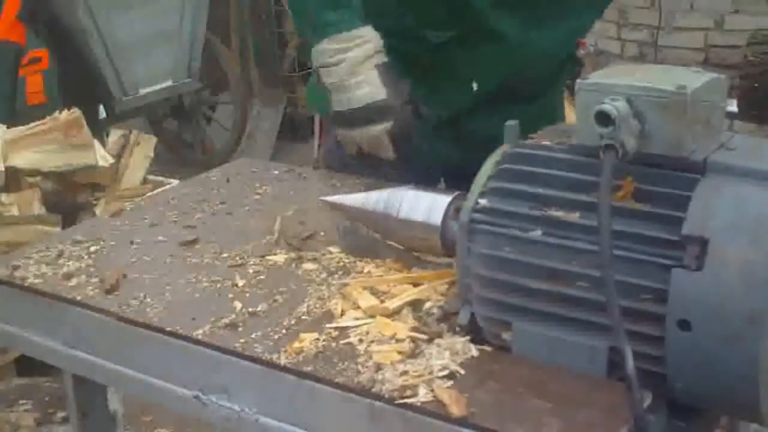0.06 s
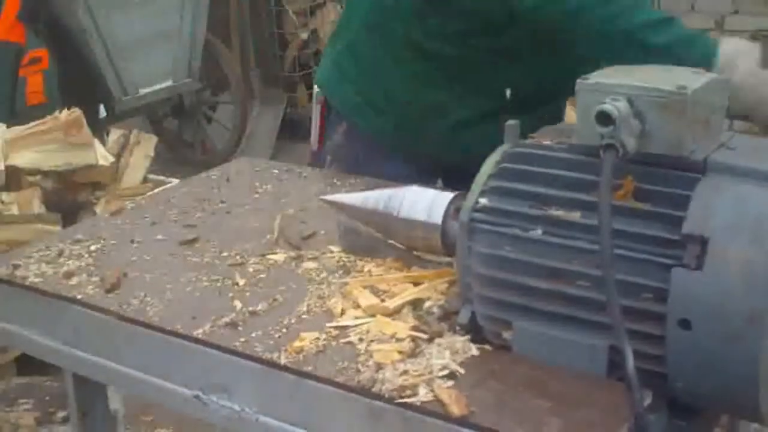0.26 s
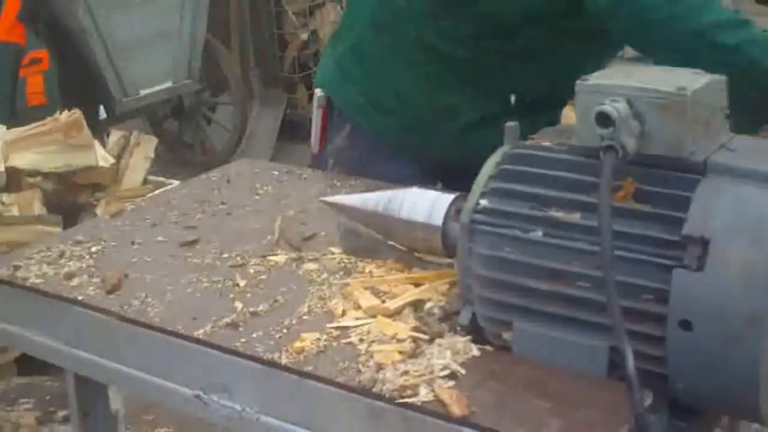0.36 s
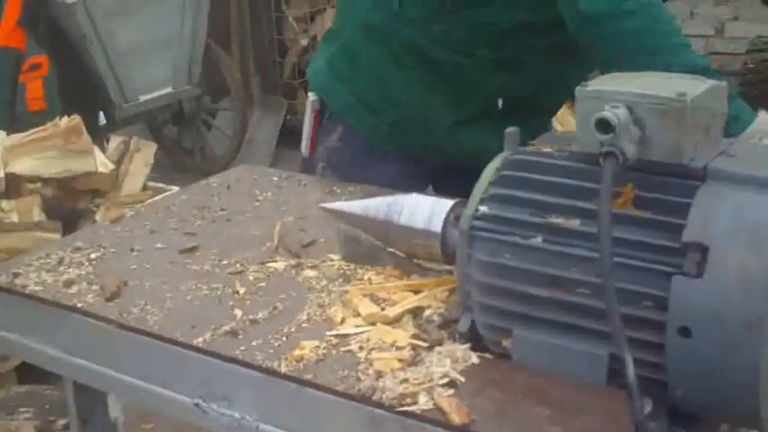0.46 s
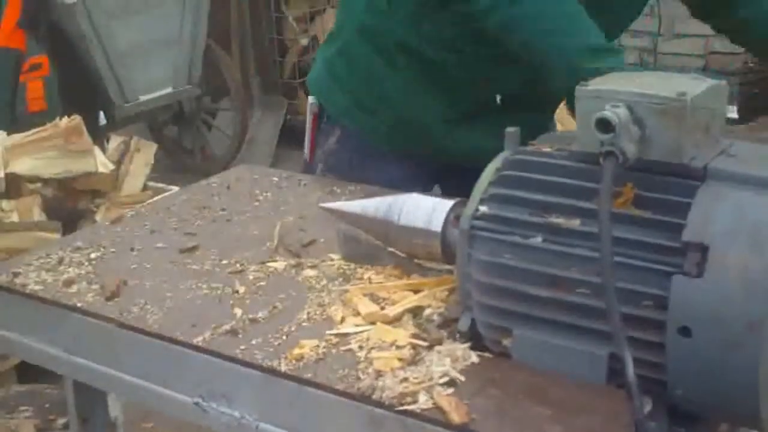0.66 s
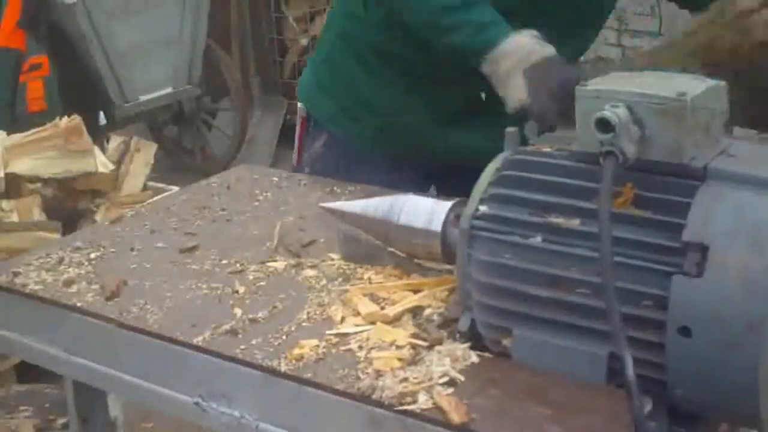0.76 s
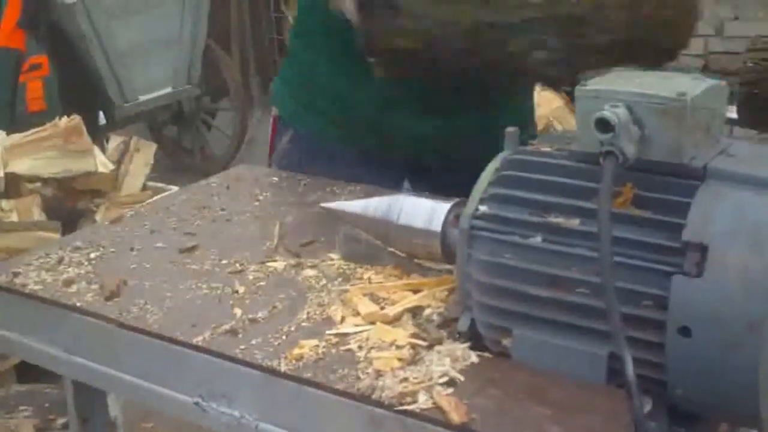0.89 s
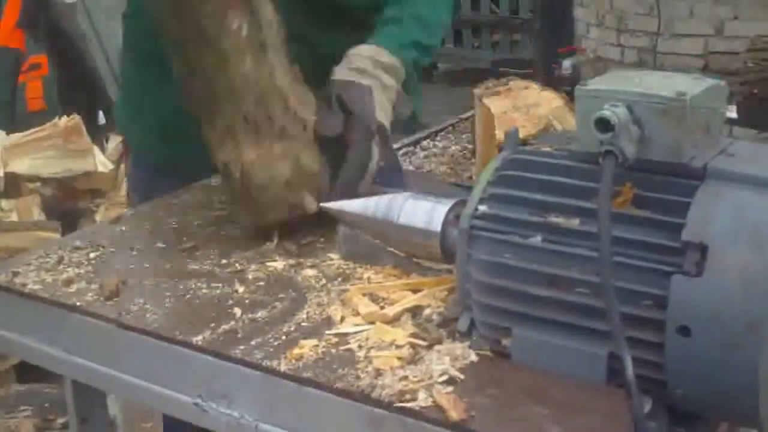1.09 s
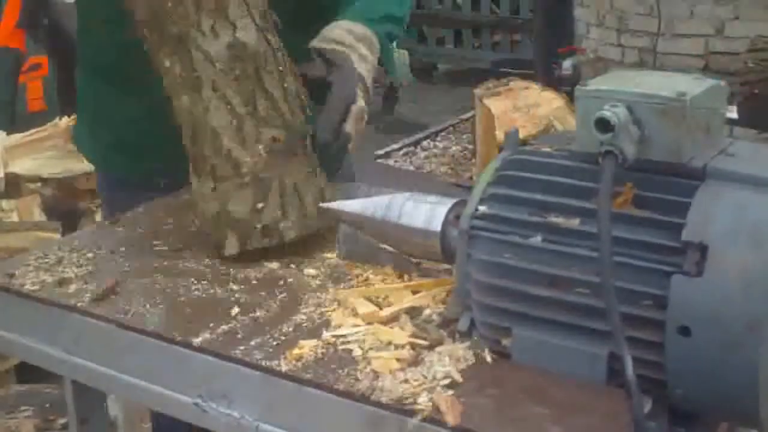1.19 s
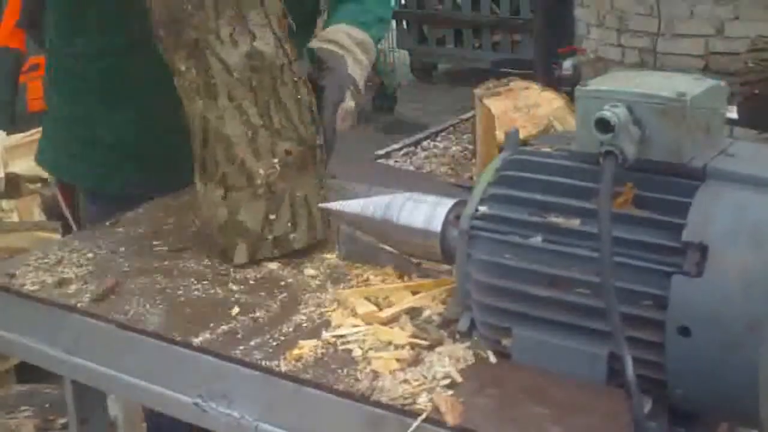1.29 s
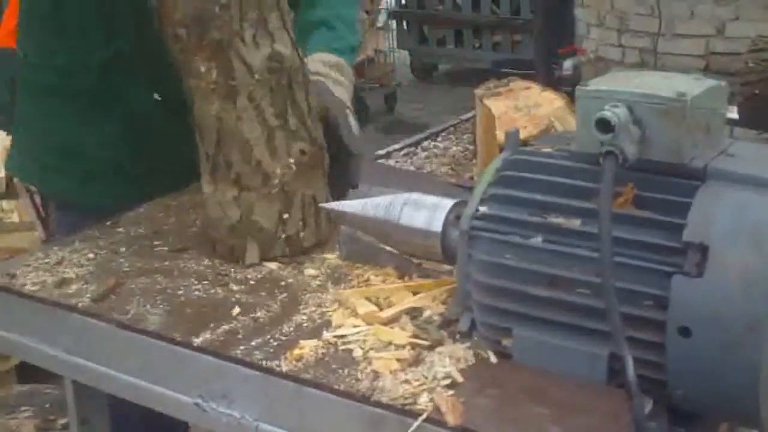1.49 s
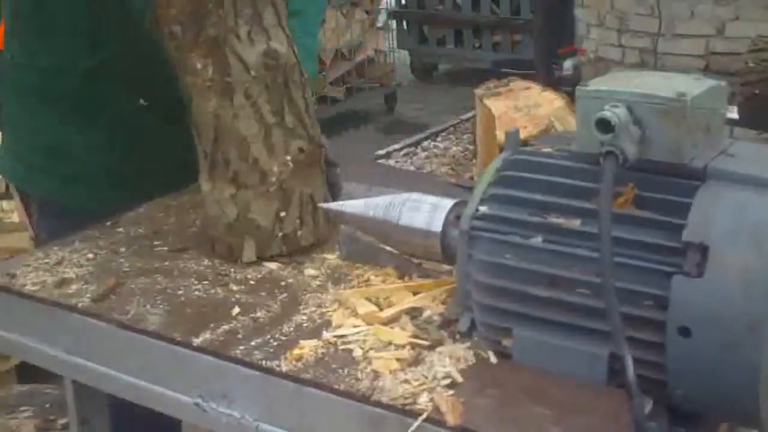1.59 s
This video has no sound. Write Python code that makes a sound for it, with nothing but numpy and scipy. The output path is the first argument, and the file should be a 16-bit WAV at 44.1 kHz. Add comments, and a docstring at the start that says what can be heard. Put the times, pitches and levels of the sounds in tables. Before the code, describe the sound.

A log splitter's electric motor whirs and whines close by in a yard. Wood thuds and clatters as a log is pulled from a pile, bark crackling, then it lands hard on a steel bench, briefly ducking the motor.

```python
"""Log splitter at idle

The electric motor of a screw log splitter whines in harmonics of its shaft rate over the rush of its fan.
A log is pulled from the pile, knocking against others and shedding bark, then slammed on the steel bench.
Each impact excites damped modes and a dense ring, echoed faintly by the yard walls.
After each heavy knock the motor's sound sinks and creeps back."""
import sys
import numpy as np
from scipy import signal
from scipy.fft import rfft, irfft, next_fast_len
from scipy.io import wavfile

SR = 44100
rng = np.random.default_rng(int(sys.argv[2]) if len(sys.argv) > 2 else 0)


def digitize_waveform(pressure):
    """Quantize a signal to 16-bit integers and store it at the path in sys.argv[1].

    Rows of a 2-D input are taken as channels; values are limited to [-1, 1].
    """
    field = np.atleast_2d(pressure).T
    bounded = np.clip(field, -1, 1)
    quanta = np.round(bounded * 32767).astype(np.int16)
    wavfile.write(sys.argv[1], SR, quanta)


N = 72765
T = np.arange(N) / SR

# Levels in the tables are relative; those of noise spectra are densities.
# shaft harmonics: f/Hz, level/dB
HARMONICS = [(400, -45), (800, -53), (1000, -48), (1200, -46), (1400, -38), (1600, -36), (1800, -41.5),
             (2400, -47), (2600, -44.5), (2800, -47.5), (3000, -51), (4400, -50), (4600, -47.5),
             (5400, -61), (6000, -55), (7000, -40.5)]
# swell of the strongest harmonic: t/s, level/dB
WHINE_SWELL = [(0, 0.5), (.25, 2), (.38, -4), (.58, 4.5), (.8, 3), (1.0, 5), (1.24, 2), (1.5, -26),
               (1.59, 9), (1.65, -0.5)]
# spectrum of the fan's rush: f/Hz, level/dB
FAN_SPECTRUM = [(40, -39), (80, -35), (130, -20), (200, -17), (290, -18), (500, -17), (750, -15),
                (1050, -9.5), (1600, -10), (2200, -9), (3000, -15.5), (4000, -17), (5600, -22), (8500, -24),
                (15500, -26.5)]
# peaks and notches of the fan cowl: f/Hz, width/Hz, lift/dB
COWL_RESONANCES = [(200, 24, 9), (403, 17, 12), (1008, 99, -6), (2490, 440, -4), (4260, 73, -7),
                   (7000, 65, 10.5), (11340, 370, 5)]
# dips in the motor's level: t/s, depth/dB, fall time/s
MOTOR_DIPS = [(0.512, 11, 0.052), (1.1, 3.5, 0.09), (1.26, 25.5, 0.046)]

# impacts: t/s, level/dB, low edge/Hz, contact brightness/Hz, factor on T60
BENCH_SLAMS = [(1.2597, -5, 166, 11900, 0.46), (1.3022, -23, 220, 2500, 0.98)]  # the log lands and rocks once
PILE_THUDS = [(.105, -33, 119, 900, 0.53), (.2752, -15.5, 221, 760, 0.78), (.282, -23, 200, 1330, 1.26),
              (.363, -25.5, 200, 1100, 1.43), (.401, -31, 200, 600, 0.45), (.415, -24.5, 200, 820, 0.68),
              (.57, -28, 70, 130, 3.3)]  # dull blows within the pile
LOG_KNOCKS = [(.5072, -20, 127, 1200, 0.8), (.5108, -10.5, 136, 1770, 0.5), (.5195, -17.5, 333, 2220, 0.78),
              (.546, -32, 170, 1440, 1.6), (1.0895, -10, 202, 445, 0.27), (1.0962, -19.5, 293, 1510, 0.61),
              (1.1162, -11.5, 1170, 5000, 0.31)]  # log against log
LOG_DROPS = [(.6312, -16, 121, 1900, 0.83)]  # a small log falls back
# modes of the struck bodies: f/Hz, level/dB, T60/s
BENCH_MODES = [(169, -27.5, 0.24), (242, -3, 0.072), (297, -3.5, 0.085), (357.5, -19, 0.25),
               (581, -8.5, 0.056), (690, -6, 0.067), (776, -17.5, 0.048), (1040, -12, 0.077),
               (1510, -31, .07), (2100, 2, 0.022), (2574, -31, .06), (3640, -39, 0.053), (4140, -16, 0.16)]  # log and bench together
PILE_MODES = [(186, -26, 0.14), (333.4, -1.5, 0.27), (396, -3.5, 0.064), (445, -5, 0.088), (640, -4, 0.085),
              (1060, -10.5, 0.16)]
LOG_MODES = [(172, -21, 0.28), (206.3, -16, 0.6), (271, -39, .08), (387, -2.5, 0.12), (469.6, -11, 0.3),
             (654, -9, 0.12), (820, 1.5, 0.033), (975, 7.5, 0.058), (1260, 7.5, 0.042), (1516, -0.5, 0.09),
             (1767, -2, 0.087), (1956, -8.5, 0.12), (2607, 4, 0.042), (3400, -14, 0.05)]
DROP_MODES = [(212, -17, 0.17), (252, -19.5, 0.19), (775, -7, 0.065), (950, 0.5, 0.047),
              (1146, -0.5, 0.041), (1406, -2.5, .04), (1480, 1, 0.033), (1560, -4, 0.033)]  # the small log, with the boom of the pile
# dense ring of bench and wood: f/Hz, level/dB, T60/s
BENCH_RING = [(40, -15, .1), (110, -19, 0.074), (250, 0, 0.066), (900, 0, 0.11), (2000, -8, 0.14),
              (4200, -8, 0.17), (8000, -10.5, 0.056), (15000, -25, 0.15)]
WOOD_RING = [(40, -13, .1), (99, -33, .15), (200, 7.5, 0.17), (600, 3.5, 0.25), (1200, 11, 0.079),
             (2500, 0.5, 0.074), (5000, 2, 0.096), (14800, -52, .04)]
# spectrum of the landing's crack: f/Hz, level/dB
CRACK_SPECTRUM = [(40, -38), (110, -43), (250, 5), (430, -0.5), (680, 7), (1500, -0.5), (4000, -2.5),
                  (6500, -4), (10000, -16), (15000, -7)]
# rumble of shifting logs: t/s, level/dB
RUMBLE_ENVELOPE = [(0, -53), (.25, -43.5), (.62, -40), (.75, -68)]
# rasps of loose splinters: t/s, level/dB, f/Hz, T60/s
SPLINTER_RASPS = [(0.288, -31, 4420, 0.12), (.362, -36, 5030, .04), (.549, -26.5, 3400, 0.052)]

# crunches of bark: t/s, level/dB, rise time/s, T60/s, low edge/Hz
BARK_CRUNCHES = [(.036, -63, .002, 0.041, 5000), (0.104, -31, .004, 0.13, 495),
                 (.258, -17, 0.0012, 0.016, 5900), (0.359, -24.5, .002, 0.15, 1500),
                 (.396, -34, .002, 0.046, 5000), (0.417, -27, 0.0012, 0.022, 2000),
                 (0.508, -19, 0.0032, 0.055, 600), (0.524, -27, .001, 0.013, 1000),
                 (0.6287, -19, 0.0019, 0.021, 4400), (1.0876, -19, .002, 0.016, 1000),
                 (1.115, -17.5, 0.0014, 0.03, 800), (1.239, -23, 0.0069, 0.16, 3000),
                 (1.3004, -33, 0.00074, 0.023, 1500), (1.3345, -42, .0005, 0.0091, 5000)]
# spectrum of bark fractures: f/Hz, level/dB
BARK_SPECTRUM = [(300, -41), (1500, -18), (3500, -2), (5500, -6.5), (9000, -7), (15000, -8.5)]
# modes of a snapping splinter: f/Hz, level/dB, T60/s
SNAP_MODES = [(5760, 1.5, 0.0021), (8100, -2, 0.002), (10900, -1.5, 0.001), (14800, -10, 0.0028)]

# spectrum of the wall echo: f/Hz, level/dB
ECHO_SPECTRUM = [(40, -19), (120, 6), (230, 2), (550, -2), (1000, -2.5), (2500, -3.5), (6000, -9.5),
                 (15000, -25)]
# spectrum of the yard's background and the pile's rumble: f/Hz, level/dB
LOW_SPECTRUM = [(25, -31), (60, -27), (110, -4.5), (165, -4.5), (240, -11.5), (500, -11), (1500, -4),
                (8000, -30)]


def motor():
    """Periodic rotation gives shaft harmonics and modulates the fan's noise at the blade-passing rate."""
    shaft_hz, blades, whine_order = 49.99, 4, 32
    angle = 2 * np.pi * shaft_hz * np.cumsum(1 + 0.0002 * drift(5.8)) / SR
    rush = coloured(rng.standard_normal(N), FAN_SPECTRUM, COWL_RESONANCES)
    out = from_db(-30.5) * rush * (1 + 0.072 * np.sin(blades * angle))
    for hz, db in HARMONICS:
        order = round(hz / shaft_hz)
        swell_db = np.interp(T, *np.transpose(WHINE_SWELL)) if order == whine_order else 0
        waver_db = 1.5 * drift(3.3)
        amplitude = np.sqrt(2) * from_db(db + 0.5 + swell_db + waver_db)
        out += amplitude * np.sin(order * angle + 2 * np.pi * rng.random())
    # the level climbs steadily and sinks at the heavy knocks
    start_db, climb_db_per_s = -7, 19.5
    dip_db = sum(depth * np.clip((T - s) / fall, 0, 1) for s, depth, fall in MOTOR_DIPS)
    return out * from_db(start_db + climb_db_per_s * T - dip_db)


def bench():
    """Impact on steel: a broadband crack, duller for a softer contact, as log and bench vibrate freely."""
    noise = coloured(rng.standard_normal(N), CRACK_SPECTRUM)
    out = impacts(BENCH_SLAMS, BENCH_MODES, BENCH_RING, ring_db=-0.5)
    for s, db, _, bright_hz, _ in BENCH_SLAMS:
        envelope = place(from_db(db + 4) * decay(T, t60=0.031), s)
        out += cut(noise * envelope, bright_hz, "low")
    return out


def woodpile():
    """Collisions excite the damped modes of the logs over the low rumble of their shifting."""
    envelope = from_db(np.interp(T, *np.transpose(RUMBLE_ENVELOPE)))
    rumble = envelope * coloured(rng.standard_normal(N), LOW_SPECTRUM)
    thuds = impacts(PILE_THUDS, PILE_MODES, WOOD_RING, ring_db=1.5)
    knocks = impacts(LOG_KNOCKS, LOG_MODES, WOOD_RING, ring_db=3.5)
    drops = impacts(LOG_DROPS, DROP_MODES, WOOD_RING, ring_db=-8.5)
    return rumble + thuds + knocks + drops


def bark():
    """Brittle fracture: bursts of tiny random impulses merge into crunches."""
    fractures_per_s = 15000
    sizes = from_db(np.minimum(rng.exponential(1, N), 4)) * rng.choice([-1, 1], N)
    grains = coloured(sizes * (rng.random(N) < fractures_per_s / SR), BARK_SPECTRUM)
    out = np.zeros(N)
    for s, db, rise, t60, low_hz in BARK_CRUNCHES:
        envelope = np.minimum(T / rise, 1) * decay(np.maximum(T - rise, 0), t60)
        out += cut(grains * place(from_db(db) * envelope, s), low_hz, "high")
    return out


def splinters():
    """One splinter snaps into heavily damped vibration; loose ones rasp as narrow-band noise."""
    snap = cut(free_vibration(SNAP_MODES, T[:SR // 20]), 3500, "high")
    out = place(from_db(0.5) * snap, s=0.6281)
    bandwidth_hz = 800
    for s, db, hz, t60 in SPLINTER_RASPS:
        roughness = cut(rng.standard_normal(N), bandwidth_hz / 2, "low")
        rasp = unit_rms(roughness * np.sin(2 * np.pi * hz * T))
        out += place(from_db(db) * rasp * decay(T, t60), s)
    return out


def yard(sound):
    """Reverberation: wall reflections add a faint, dull tail, heard over a low ambient noise."""
    tail = place(coloured(rng.standard_normal(N), ECHO_SPECTRUM) * decay(T, t60=0.25), s=0.012)
    echo = signal.fftconvolve(sound, tail / np.sqrt(np.sum(tail ** 2)))[:N]
    background = coloured(rng.standard_normal(N), LOW_SPECTRUM)
    return from_db(-21.5) * echo + from_db(-51) * background


def impacts(blows, modes, ring, ring_db):
    """Impulse response: a body's main modes and dense ring; the contact sets bandwidth and damping."""
    t, out = T[:SR // 2], np.zeros(N)
    ages = t / np.array(blows)[:, 4:]  # one time axis per blow, scaled for its damping
    for (s, db, low_hz, bright_hz, stretch), tail in zip(blows, dense_ring(ring, ages)):
        tone = free_vibration([(hz, level, t60 * stretch) for hz, level, t60 in modes], t)
        body = cut(tone + from_db(ring_db) * tail, low_hz, "high")
        out += place(from_db(db) * cut(body, bright_hz, "low"), s)
    return out


def free_vibration(modes, t):
    """Modal superposition: damped sinusoids of alternating polarity."""
    return sum((-1) ** k * from_db(db) * decay(t, t60) * np.sin(2 * np.pi * hz * t)
               for k, (hz, db, t60) in enumerate(modes))


def dense_ring(ring, ages):
    """Modal overlap: crowded modes act as bands of noise, each decaying at its own rate."""
    edges = np.geomspace(30, 17000, 15)
    white = rng.standard_normal((len(ages), 2, ages.shape[1]))
    out = 0
    for k, (low, high) in enumerate(zip(edges, edges[1:])):
        hz = np.sqrt(low * high)
        bandpass = signal.butter(2, [low, high], "band", fs=SR, output="sos")
        # adjacent bands use independent noise; reversal moves the filter's build-up off the attack
        band = signal.sosfilt(bandpass, white[:, k % 2])[:, ::-1]
        out += band * from_db(at_hz(ring, hz)) * decay(ages, t60=at_hz(ring, hz, column=2))
    gains = from_db(at_hz(ring, np.linspace(1, SR / 2, SR // 10)))
    return out / np.sqrt(np.mean(gains ** 2))


def coloured(x, spectrum, peaks=()):
    """Linear filtering by a spectrum with Lorentzian peaks and notches, scaled to unit rms."""
    size = next_fast_len(N)
    hz = np.arange(size // 2 + 1) * SR / size
    peaks_db = sum(lift / (1 + (2 * (hz - f) / width) ** 2) for f, width, lift in peaks)
    gain = from_db(at_hz(spectrum, hz) + peaks_db)
    return unit_rms(irfft(rfft(x, size) * gain, size)[:N])


def drift(hz):
    """Low-passed noise: a slow random wander of unit rms."""
    hop, settling = 40, 2000
    pole = np.exp(-2 * np.pi * hz * hop / SR)
    white = rng.standard_normal(N // hop + settling + 2)
    slow = signal.lfilter([1], [1, -2 * pole, pole * pole], white)[settling:]
    return np.interp(np.arange(N) / hop, np.arange(len(slow)), unit_rms(slow))


def cut(x, hz, kind):
    """Second-order high- or low-pass filter."""
    return signal.sosfilt(signal.butter(2, hz, kind, fs=SR, output="sos"), x + 1e-18)


def at_hz(table, hz, column=1):
    """Interpolation of a spectrum on a logarithmic frequency axis."""
    table = np.array(table)
    return np.interp(np.log(hz + 1e-9), np.log(table[:, 0]), table[:, column])


def decay(t, t60):
    """Exponential decay, 60 dB in t60 seconds."""
    return from_db(-60 * t / t60)


def place(x, s):
    """Delay by s seconds within the scene's length."""
    return np.concatenate([np.zeros(int(s * SR)), x, np.zeros(N)])[:N]


def from_db(db):
    """Level to amplitude ratio."""
    return 10 ** (np.asarray(db) / 20)


def unit_rms(x):
    """Normalisation to unit rms."""
    return x / np.sqrt(np.mean(x ** 2) + 1e-20)


def scene():
    """Superposition of all sources, alike in both channels; only the wood and bench sounds echo."""
    wood = woodpile() + splinters() + bark() + bench()
    return np.tile(motor() + wood + yard(wood), (2, 1))


def record(dry):
    """Soft saturation flattens the highest peaks; a steep low-pass limits the bandwidth."""
    ceiling, cutoff_hz = 0.9, 15900
    limited = dry / (1 + (dry / ceiling) ** 6) ** (1 / 6)
    return signal.sosfilt(signal.ellip(12, .1, 95, cutoff_hz, fs=SR, output="sos"), limited)


dry = scene()
out = record(dry)
digitize_waveform(out)
```